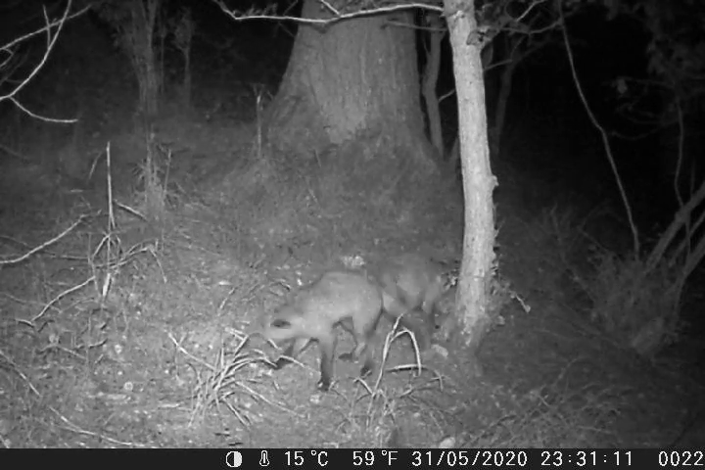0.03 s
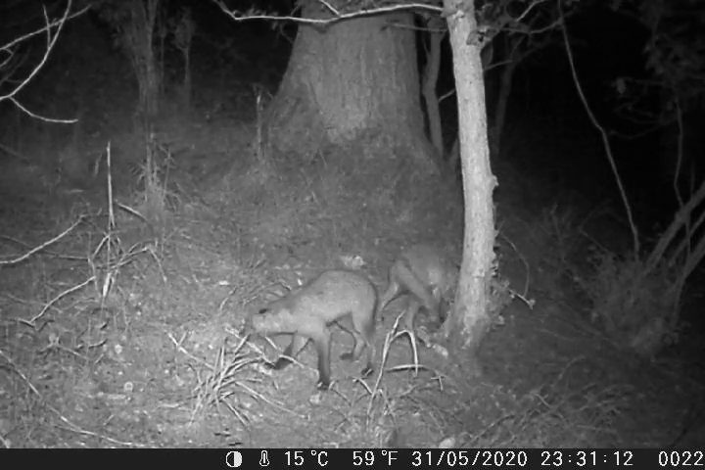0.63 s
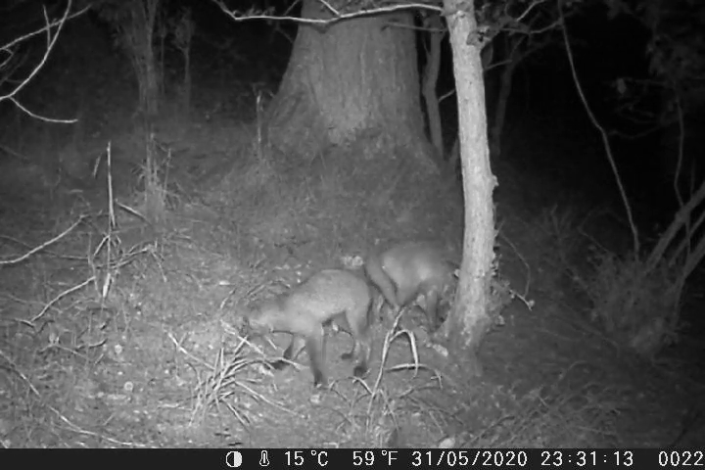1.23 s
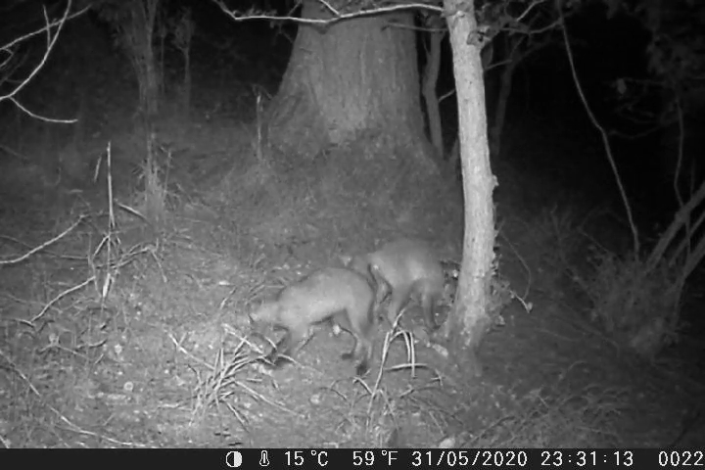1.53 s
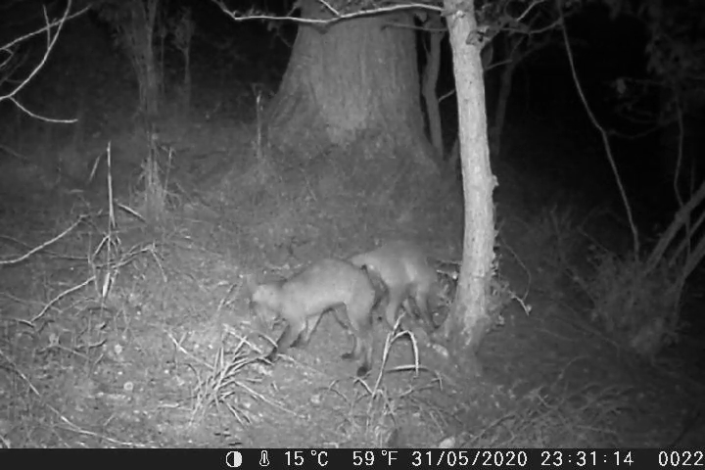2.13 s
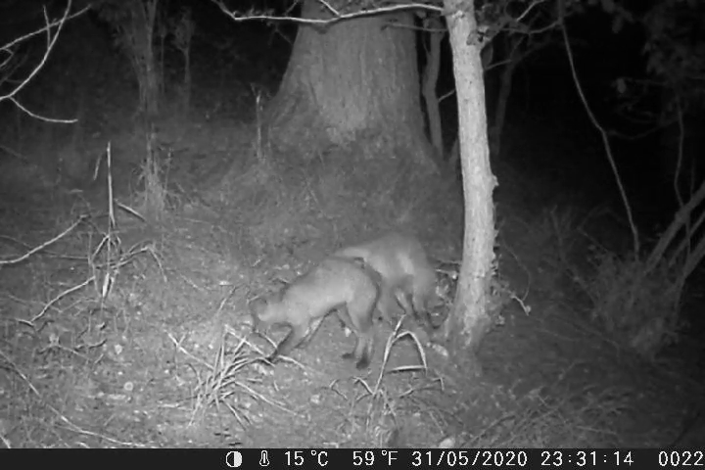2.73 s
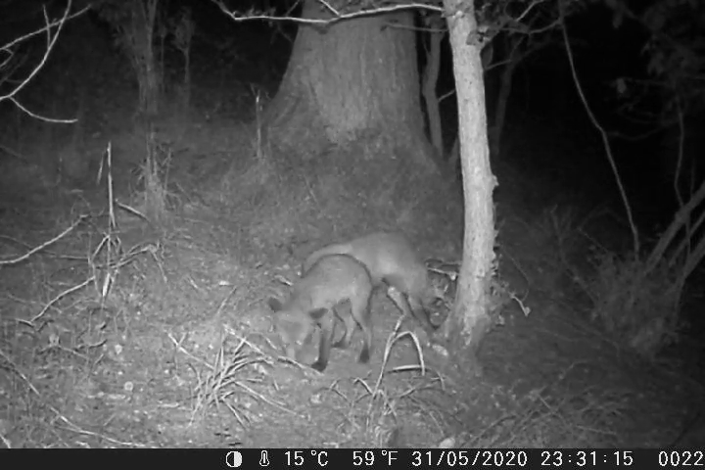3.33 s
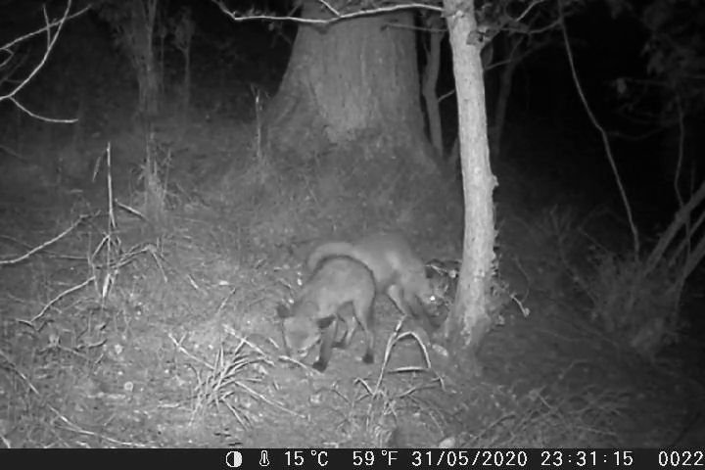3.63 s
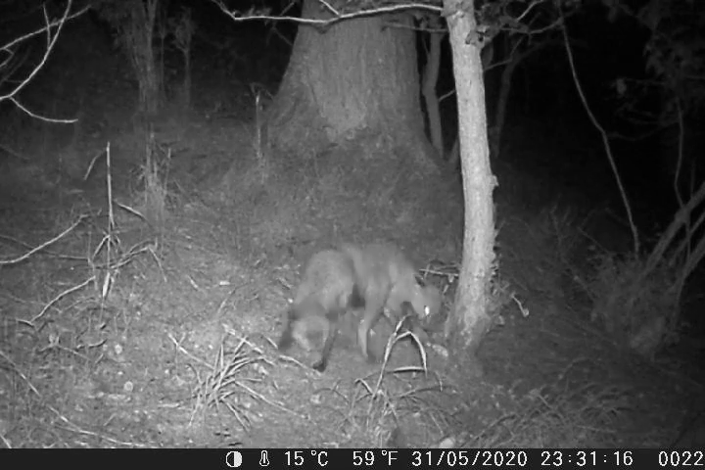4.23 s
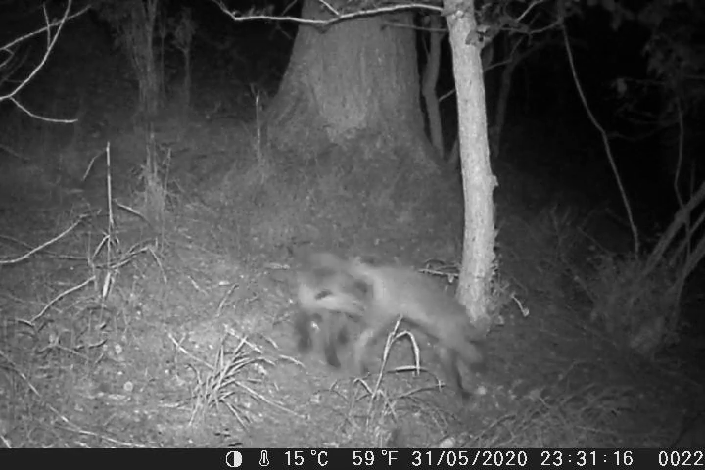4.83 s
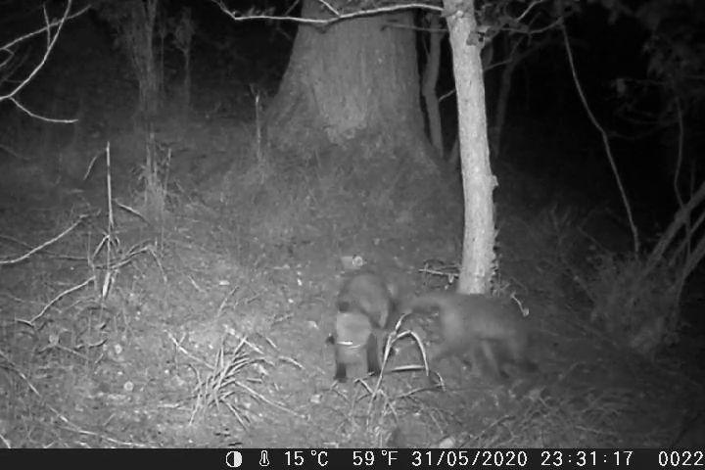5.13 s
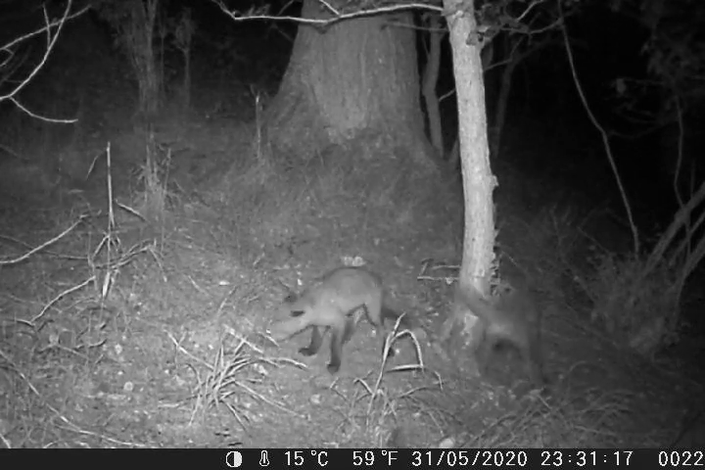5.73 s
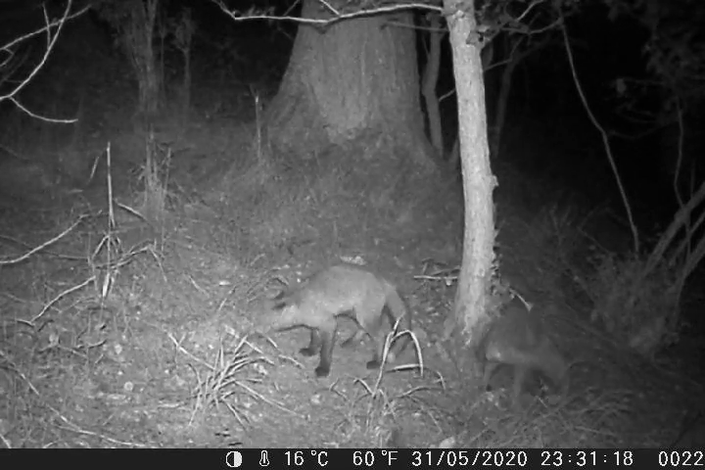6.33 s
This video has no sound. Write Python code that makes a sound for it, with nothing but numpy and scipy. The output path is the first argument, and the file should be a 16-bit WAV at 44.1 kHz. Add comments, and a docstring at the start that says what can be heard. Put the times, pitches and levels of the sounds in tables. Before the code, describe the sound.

A steady, soft hiss runs throughout, about six and a half seconds, in a wood at night. Light wind flutters on the microphone as a low rumble with dull bumps, strongest around 0.8 seconds and again near 1.8 and 4.3. At 4.0 seconds a scuffling fox a few metres away gives one short, high yelp, an almost pure tone that arches in pitch and roughens as it swells. At 4.3 comes a very brief, hoarse, rattling bark that sags in pitch. From 4.5 a raspy, snarling cry rises, cracks and thins to a pulsing whine, with a second, wavering whistle inside it, ending by about 4.85. A last, much fainter yelp follows at 5.2. The calls have a slight, dull echo from the trees. Wind and hiss continue to the end, with small bumps near 5.5 and 5.8.

```python
"""Light wind rumbles and bumps on the microphone over a steady hiss, in a wood at night.
About four seconds in, two foxes scuffle a few metres from the trail camera. One yelps, gives a hoarse
bark, then a raspy cry that thins to a whine with a second, whistling tone in it, and a last faint yelp.
The yelps are nearly pure tones; in the bark and cry, rough vocal folds ring the throat.
The trees echo a little."""
import sys
import numpy as np
from scipy import signal
from scipy.fft import rfft, irfft
from scipy.io import wavfile
from scipy.ndimage import uniform_filter1d

SR = 44100
rng = np.random.default_rng(int(sys.argv[2]) if len(sys.argv) > 2 else 0)


def wav_record(signal):
    """Record a signal, one row per channel, as 16-bit PCM in the file named by sys.argv[1]."""
    frames = np.transpose(np.atleast_2d(signal))
    bounded = np.clip(frames, -1, 1)
    # unit amplitude maps onto the largest positive 16-bit level
    quanta = np.round(bounded * 32767).astype(np.int16)
    wavfile.write(sys.argv[1], SR, quanta)


N = 289737
TIME = np.arange(N) / SR

# colour of the cry and its whistle as heard at the microphone: throat resonances,
# with notches from the ground or microphone: (frequency [Hz], gain [dB])
CRY_COLOUR = [(600, -36), (900, -22), (1100, 2.5), (1300, 3), (1460, 0.5), (1620, -0.5), (2100, -19),
              (2600, -30), (2850, -7), (3180, -29.5), (3450, -17), (4050, -27), (4330, -7.5), (4750, -23.5),
              (6200, -36)]


def undb(db):
    """Decibels to gain."""
    return 10 ** (np.asarray(db) / 20)


def unit(x):
    """Scale to rms 1."""
    return x / np.sqrt(np.mean(x ** 2))


def strength(x, size=500):
    """Running rms, smoothed twice over size samples."""
    return np.sqrt(np.abs(uniform_filter1d(uniform_filter1d(x ** 2, size), size)) + 1e-12)


def held(x, size=500):
    """Even out the strength of a sound, so that an envelope can drive it."""
    return x / strength(x, size)


def curves(table, t):
    """The columns of a table, joined by straight lines in time."""
    times, *columns = np.transpose(table)
    return [np.interp(t, np.sort(times), column) for column in columns]


def envelope(t, start, end, attack_s, release_s):
    """Gain that rises, holds at 1 and dies away."""
    return np.clip((t - start) / attack_s, 0, 1) * np.clip((end - t) / release_s, 0, 1) ** 2


def bell(x, centre, width):
    """A smooth hump of height 1."""
    return np.exp(-((x - centre) / width) ** 2 / 2)


def freqs(t):
    """Frequency axis of a stretch of sound."""
    return np.maximum(np.fft.rfftfreq(len(t), 1 / SR), 1)


def colour(points, t):
    """Gain at every frequency from (frequency [Hz], gain [dB]) points."""
    hz, db = np.transpose(points)
    return undb(np.interp(np.log(freqs(t)), np.log(np.sort(hz)), db))


def resonance(hz, width, t):
    """Gain of a steep resonance."""
    return 1 / (1 + ((freqs(t) - hz) / width * 1.55) ** 2) ** 2


def filtered(x, gain):
    """Pass a sound through a frequency response."""
    return irfft(rfft(x) * gain, len(x))


def noise(gain, t):
    """Noise of rms 1 with a given colour."""
    return unit(filtered(rng.standard_normal(len(t)), gain))


def tremor(hz, t):
    """Random unsteadiness, up to about hz changes a second."""
    return noise(1 / (1 + (freqs(t) / hz) ** 4), t)


def turn(hz):
    """Phase of an oscillator."""
    return 2 * np.pi * np.cumsum(hz) / SR


def hiss(midband_db=-74.5):
    """Slowly swaying night air and the even hiss of the microphone."""
    # spectrum of the steady background: (frequency [Hz], relative level [dB])
    hiss_colour = [(8, 17.5), (18, 30), (45, 14.5), (80, 4.5), (200, -.5), (300, -5.5), (500, -12),
                   (800, -16.5), (1500, -20.5), (2700, -25.5), (3200, -29.5), (4900, -35), (7400, -30.5),
                   (8500, -42)]
    air = noise(colour(hiss_colour, TIME), TIME)
    hz = freqs(TIME)
    midband = filtered(air, (hz > 300) & (hz < 3000))
    return air / midband.std() * undb(midband_db)


def wind(breeze_db=-64, flutter_db=3, flutter_hz=9):
    """Eddies buffet the microphone: a fluttering breeze with gusts on top."""
    # spectrum of the rumble: (frequency [Hz], relative level [dB])
    wind_colour = [(10, -15), (30, -2), (45, 4), (70, -1.5), (100, -2), (130, -12.5), (170, -20.5),
                   (250, -36), (500, -71.5)]
    # gusts on the microphone: (time [s], half width [s], level [dB])
    gusts = [(0.061, .03, -50.5), (.41, 0.037, -51), (.8, .14, -47), (1.51, 0.072, -54.5),
             (1.86, .045, -46.5), (2.09, .07, -53), (3.02, .04, -53.5), (3.92, 0.055, -53),
             (4.31, 0.14, -49), (4.93, .03, -52), (5.52, .035, -53.5), (5.79, .04, -55)]
    breeze = undb(breeze_db + flutter_db * tremor(flutter_hz, TIME))
    gusting = sum(undb(db) * bell(TIME, when, width) for when, width, db in gusts)
    rumble = held(noise(colour(wind_colour, TIME), TIME), size=6000)
    return rumble * np.hypot(breeze, gusting)


def bumps(weak_per_s=8, weak_db=-54, spread_db=2.5, weak_hz=78.6):
    """Single eddies hit the microphone and swing the pressure once or twice: a few strong, many weak."""
    # strong, dull bumps of air: (time [s], envelope peak [dB], pitch [Hz])
    strong = [(0.716, -48, 87), (0.789, -36.5, 38.2), (0.946, -36, 85.5), (1.831, -41.5, 88),
              (3.903, -45.5, 85), (4.255, -40.5, 103), (5.514, -46, 81.7), (5.79, -46, 79)]
    chance = rng.random((int(weak_per_s * N / SR), 3))
    weak = [(place * N / SR, weak_db + spread_db * (2 * size - 1), weak_hz * 2 ** (pitch - .5))
            for place, size, pitch in chance]
    out = np.zeros(N)
    for when, db, hz in strong + weak:
        near = np.abs(TIME - when) < .08
        cycles = (TIME[near] - when) * hz
        out[near] += undb(db) * bell(cycles, 0, width=.46) * np.cos(2 * np.pi * (cycles + rng.random()))
    return out


def trees(x, t60_s=.7, gain_db=-21, damp_hz=2500):
    """Trunks scatter a faint, dull echo back to the microphone."""
    t = TIME[:SR]
    scatter = rng.standard_normal(SR) * np.exp(-np.log(1000) * t / t60_s) * (t > .012)
    echo = signal.fftconvolve(x, unit(scatter) / np.sqrt(SR))[:len(x)]
    return undb(gain_db) * filtered(echo, 1 / np.hypot(1, freqs(x) / damp_hz))


def squeal(t, hz, rough, call_colour, flutter_hz, jitter, drag, octave_db, rasp_db):
    """A thin, high tone; when forced, it rasps, and an uneven flutter chops it and drags its pitch."""
    flutter = np.sin(turn(flutter_hz * (1 + .22 * tremor(120, t))))
    phase = turn(hz * (1 + rough * (jitter * tremor(300, t) + drag * flutter)))
    tone = np.sin(phase) + undb(octave_db) * np.sin(2 * phase)
    rasp = undb(rasp_db) * rough * tremor(7000, t)
    chopped = (tone + rasp) * (1 + rough * flutter)
    return held(filtered(chopped, colour(call_colour, t)))


def yelps(t, arch_hz_per_s2=120000, swell_db_per_s=120):
    """Short squeals that arch in pitch, swell, break up as they are forced and stop quickly."""
    # the yelps: (start [s], crest [s], end [s], pitch at the crest [Hz], level swelled towards [dB])
    calls = [(4.001, 4.053, 4.094, 1362, -50), (5.176, 5.182, 5.222, 1325, -68.5)]
    # colour of a yelp as heard at the microphone: throat resonances,
    # with notches from the ground or microphone: (frequency [Hz], gain [dB])
    yelp_colour = [(600, -12), (950, 8.5), (1150, 5.5), (1380, 2), (1490, -11), (1650, -5), (2100, -14),
                   (2800, -15), (3200, -22), (4400, -13.5), (5200, -22), (7000, -21)]
    out = np.zeros(len(t))
    for start, crest, end, crest_hz, db in calls:
        during = np.clip(t, start, end)
        hz = crest_hz - arch_hz_per_s2 * (during - crest) ** 2
        rough = np.interp(t, [start, crest], [.091, .48])
        tone = squeal(t, hz, rough, yelp_colour, flutter_hz=189.6, jitter=.052, drag=.043,
                      octave_db=-34, rasp_db=-5)
        swell = undb(db - swell_db_per_s * (end - during))
        out += tone * swell * envelope(t, start, end, attack_s=.008, release_s=.018)
    return out


def throat_voice(t, hz, call_colour, rough, bright_db, jitter, rattle_hz, rattle, snarl_gain=0):
    """Vocal folds ring the throat; roughness shakes their pitch and breaks the cycles into noisy puffs."""
    # resonances that open as the lips draw back: (frequency [Hz], width [Hz], relative gain [dB])
    snarl_resonances = [(2336, 430, -4.5), (5540, 380, -27), (7000, 350, -22.5), (7500, 320, -25.5)]
    clear_hz, treble_hz = 3600, 3100
    rough = np.clip(rough, 0, 1)
    phase = turn(hz * (1 + jitter * rough * tremor(250, t)))
    folds = unit(sum(np.cos(k * phase + k * k) for k in range(1, 15)))
    puffs = unit(tremor(8000, t) * (1 + .6 * np.cos(phase)))
    # only the lower harmonics stay clear; the top is always hoarse
    clear = 1 / (1 + (freqs(t) / clear_hz) ** 6)
    folds = filtered(folds, np.sqrt(clear)) + .64 * filtered(puffs, np.sqrt(1 - clear))
    source = np.sqrt(1 - rough ** 2) * folds + rough * puffs
    # loose tissue rattles and chops the air stream
    tissue = np.sin(turn(rattle_hz * (1 + .3 * tremor(100, t))))
    source = source * np.exp(rattle * rough * tissue)
    # a wide mouth lets out the treble, and drawn lips add the snarl
    voice = filtered(source, colour(call_colour, t))
    treble = filtered(voice, 1 / (1 + (treble_hz / freqs(t)) ** 16))
    lips = sum(undb(db) * resonance(centre, width, t) for centre, width, db in snarl_resonances)
    snarl = filtered(source, lips)
    return (voice - treble + undb(bright_db) * treble + snarl_gain * snarl) / strength(voice)


def bark(t, start_s=4.291, end_s=4.373, start_hz=585, sag_hz_per_s=1000, gain_db=-57.5):
    """A hoarse, rattling burst that sags in pitch, bright at first and duller as the mouth closes."""
    # colour of the bark as heard at the microphone: throat resonances,
    # with notches from the ground or microphone: (frequency [Hz], gain [dB])
    bark_colour = [(550, -39), (780, -11.5), (950, 0.5), (1250, 5), (1470, -13), (1640, 6), (2100, -33),
                   (2400, -13), (2900, -10.5), (3200, -22.5), (4400, -15), (4850, -25), (5300, -50),
                   (5720, -24), (6100, -48)]
    age = np.clip(t, start_s, end_s) - start_s
    voice = throat_voice(t, start_hz - sag_hz_per_s * age, bark_colour, rough=.69,
                         bright_db=10 - 270 * age, jitter=.11, rattle_hz=138, rattle=.89)
    return voice * undb(gain_db) * envelope(t, start_s, end_s, attack_s=.036, release_s=.033)


def whistle(t, base_db=-68, ring_hz=1589, ring_db=8.5):
    """A second tone, free of the cry's pitch, that swells whenever it meets a resonance of the throat."""
    # wavering path of the tone: (time [s], pitch [Hz])
    path = [(4.615, 1813), (4.663, 1818), (4.681, 1702), (4.691, 1845), (4.713, 1597), (4.729, 1614),
            (4.749, 1843), (4.771, 1708), (4.805, 1694), (4.819, 1600), (4.853, 1548), (4.86, 1480)]
    hz, = curves(path, t)
    db = base_db + ring_db * bell(hz, ring_hz, width=38)
    tone = squeal(t, hz, rough=.2, call_colour=CRY_COLOUR, flutter_hz=250, jitter=.044, drag=.041,
                  octave_db=-5.5, rasp_db=-18)
    return tone * undb(db) * envelope(t, path[0][0], path[-1][0], attack_s=.005, release_s=.018)


def cry(t, snarl_s=4.561, snarl_db=15.5, crack_s=4.638, dulling_db_per_s=35, gain_db=1.25):
    """A snarling scream cracks and thins to a clearer whine while the mouth closes."""
    # the opening scream: (time [s], pitch [Hz], relative level [dB])
    scream = [(4.519, 567.9, -72), (4.541, 633.3, -65), (4.561, 645.3, -69), (4.585, 657.6, -60),
              (4.623, 615.0, -63), (4.65, 538.5, -62.5)]
    # the whine that follows in waves: (time [s], pitch [Hz], relative level [dB])
    whine = [(4.678, 547, -57), (4.688, 569.1, -63), (4.7, 576.7, -75), (4.718, 538.3, -68),
             (4.738, 568.4, -63.5), (4.748, 583, -73), (4.788, 566.9, -61.5), (4.832, 562, -71)]
    hz, db = curves(scream + whine, t)
    hz = hz * (1 + .012 * tremor(70, t))
    screaming = t < crack_s
    snarl = bell(t, snarl_s, width=.02)
    crack = bell(t, crack_s, width=.016)
    rough = np.where(screaming, .42, .28) + .46 * crack + .12 * snarl
    scream_bright_db = np.minimum(8, -59.5 - db)  # at its loudest the scream gains only below the treble
    whine_bright_db = -3.5 - dulling_db_per_s * (t - crack_s)
    bright_db = np.where(screaming, scream_bright_db, whine_bright_db)
    voice = throat_voice(t, hz, CRY_COLOUR, rough, bright_db, jitter=.05,
                         rattle_hz=197, rattle=.58, snarl_gain=undb(snarl_db) * snarl)
    gate = envelope(t, scream[0][0], whine[-1][0], attack_s=.002, release_s=.006)
    return voice * undb(db + gain_db) * gate


def scene():
    """Wind and hiss at the microphone, and a fox calling a few metres off among the trees."""
    first = int(3.9 * SR)
    scuffle = slice(first, first + 72000)
    t = TIME[scuffle]
    fox = yelps(t) + bark(t) + cry(t) + whistle(t)
    out = wind() + bumps() + hiss()
    out[scuffle] += fox + trees(fox)
    return out[None]


def record(dry):
    """The trail camera cuts the treble steeply above 8500 Hz."""
    return signal.sosfilt(signal.ellip(10, .2, 70, 8500, fs=SR, output="sos"), dry)


dry = scene()
out = record(dry)
wav_record(out)
```